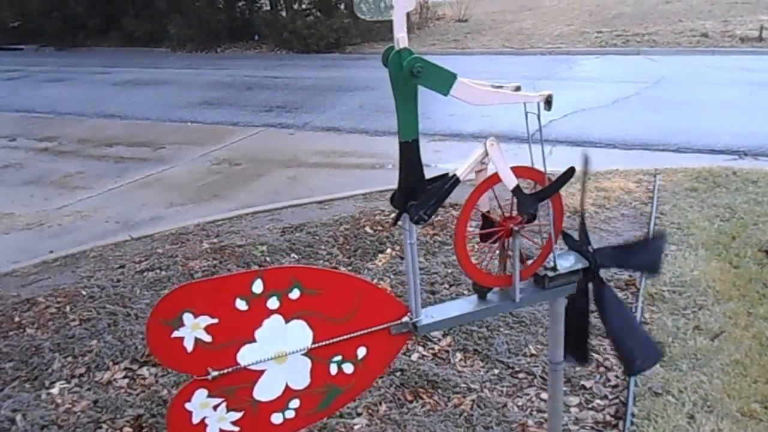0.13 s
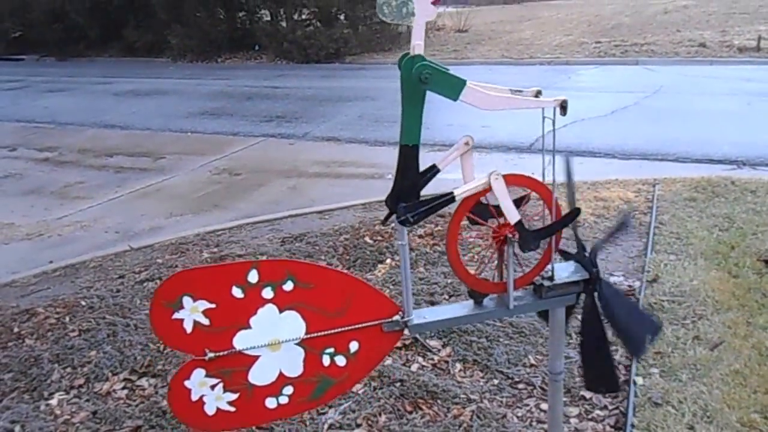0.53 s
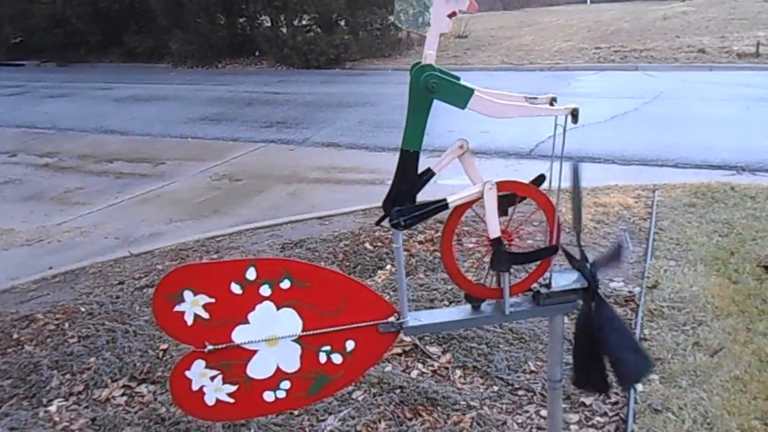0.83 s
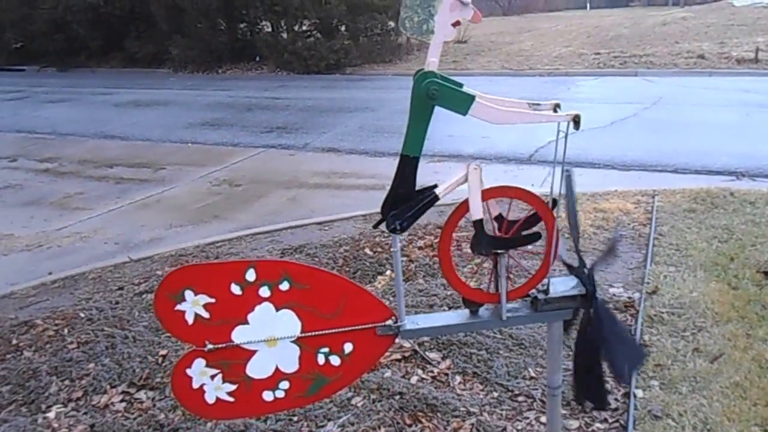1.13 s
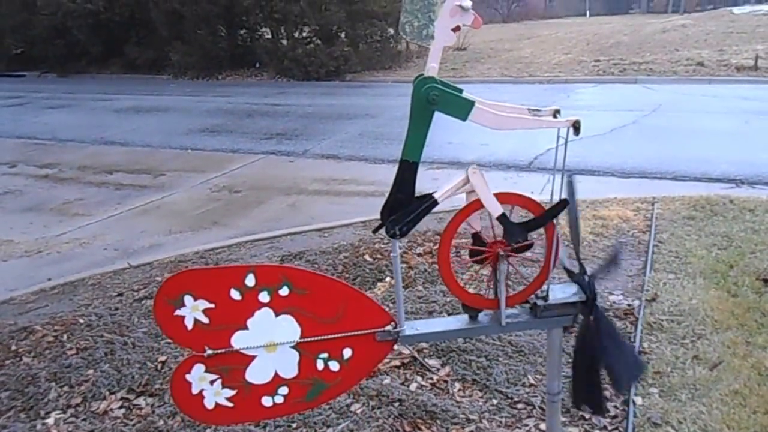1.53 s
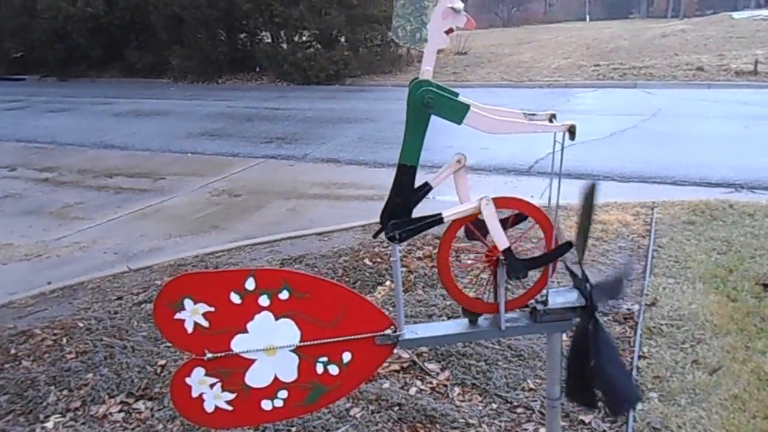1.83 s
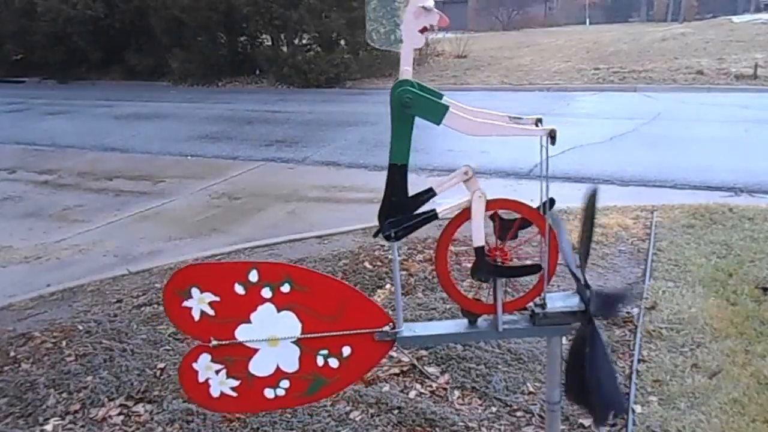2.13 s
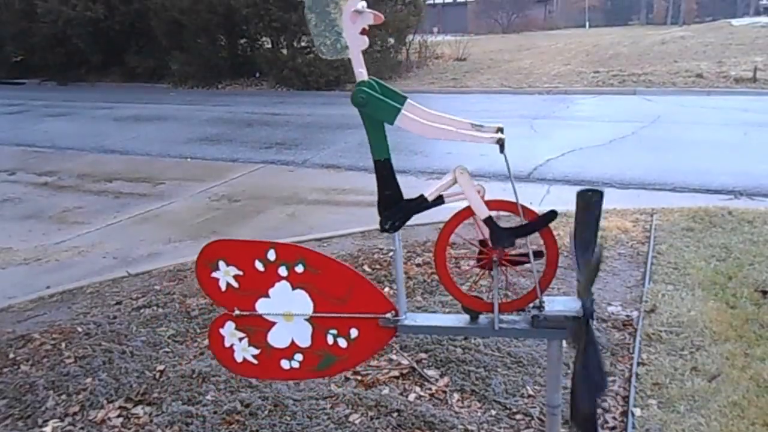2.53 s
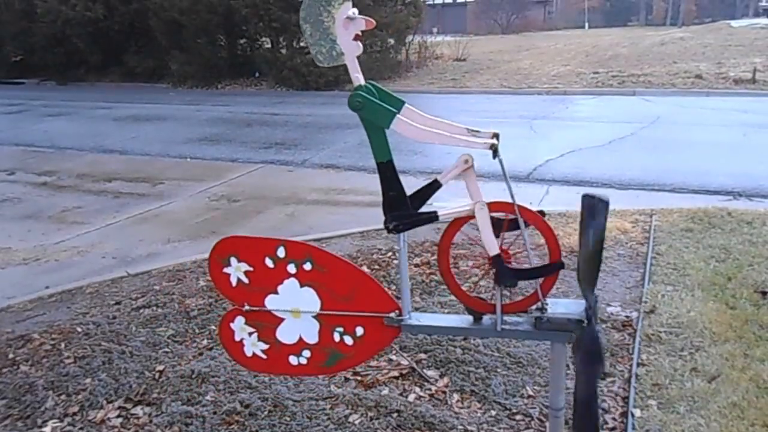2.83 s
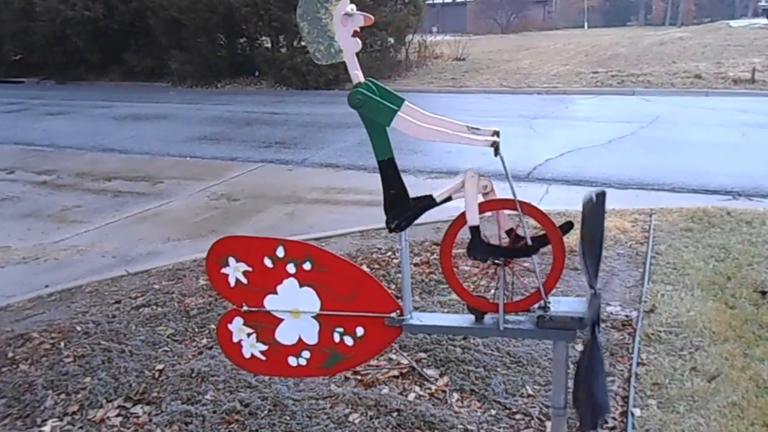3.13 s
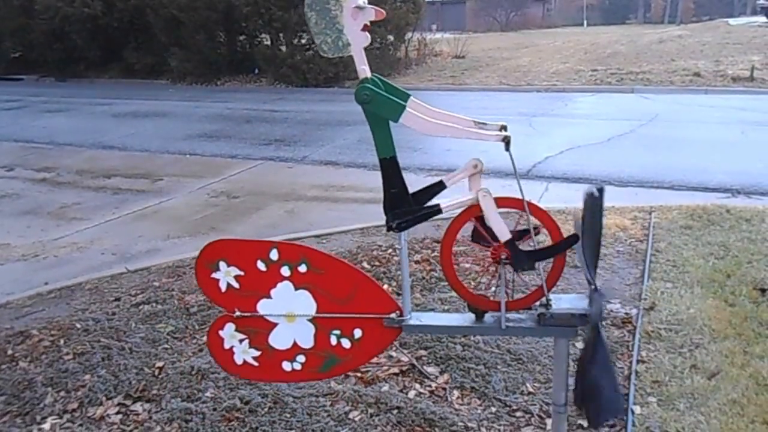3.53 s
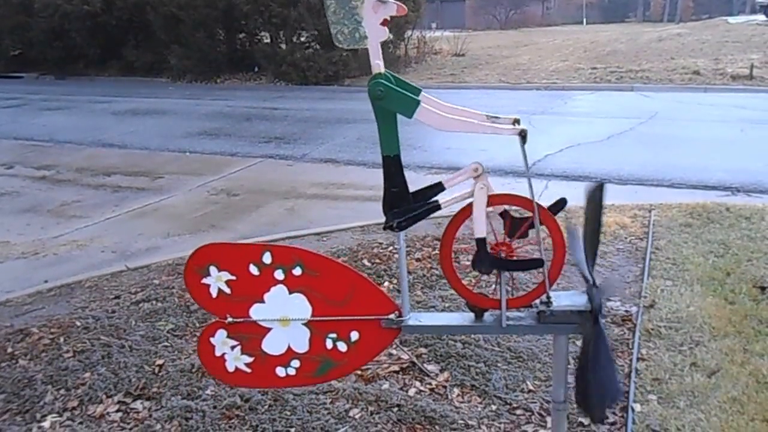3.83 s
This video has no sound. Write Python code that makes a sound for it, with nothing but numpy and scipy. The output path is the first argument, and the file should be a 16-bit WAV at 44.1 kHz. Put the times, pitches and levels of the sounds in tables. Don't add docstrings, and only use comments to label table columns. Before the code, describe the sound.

Gusty wind rumbles, thumps and flutters on a small bare camera microphone outdoors by a road, in uneven bursts over a soft distant roar, with sparse faint ticks from a spinning wind-driven lawn ornament.

```python
import sys
import numpy as np
from scipy import signal
from scipy.fft import rfft, irfft
from scipy.io import wavfile
from scipy.ndimage import uniform_filter1d

SR = 44100
rng = np.random.default_rng(int(sys.argv[2]) if len(sys.argv) > 2 else 0)


def put_to_file(sound):
    columns = np.atleast_2d(sound).T
    safe = np.clip(columns, -1, 1)
    whole_steps = np.round(safe * 32767)
    wavfile.write(sys.argv[1], SR, whole_steps.astype(np.int16))


def gain_from_decibels(decibels):
    exponent = np.asarray(decibels, float) / 20
    return 10 ** exponent


N = 176400


def evened(x):
    return x / np.sqrt(np.mean(x ** 2) + 1e-20)


def read(points, hz):
    f, value = np.transpose(points)
    return np.interp(np.log(hz + 1), np.log(f + 1), value)


def add(mix, start_s, sound):
    part = mix[max(round(start_s * SR), 0):][:len(sound)]
    part += sound[:len(part)]


def smooth(x, width, axis=-1):
    return uniform_filter1d(uniform_filter1d(x, width, axis), width, axis)


def drift(count, smooth_s):
    return evened(smooth(rng.standard_normal(count), max(int(smooth_s * SR), 2)))


def swirl(swirl_hz, length_s, sharp=0.2, thump=0.39):
    t = np.arange(int(length_s * SR)) / SR
    turn = rng.random()
    wobble = np.array([drift(8000, 0.0074), drift(8000, 0.0074)])[:, :len(t)]
    speed, size = wobble - wobble.mean(axis=1, keepdims=True)

    angle = 2 * np.pi * (turn + np.cumsum(swirl_hz * np.exp(0.18 * speed)) / SR)
    swing = np.sin(angle) + sharp * np.sin(2 * angle + 1) + sharp ** 2 * np.sin(3 * angle + 2)
    swing = evened(swing * np.exp(0.36 * size))
    slow = np.sin(2 * np.pi * (turn + 0.36 * swirl_hz * t))

    rise = 0.29
    passed = t / t[-1]
    ramp = np.minimum(passed / rise, (1 - passed) / (1 - rise)).clip(0, 1)
    return np.sin(np.pi / 2 * ramp) ** 2 * (swing + thump * slow)


def small_eddies():
    per_s, spread_db = 90, 2.5
    size = gain_from_decibels(spread_db * np.minimum(rng.exponential(1, N), 4)) * (rng.random(N) < per_s / SR)
    kind = rng.integers(0, 16, N)
    out = np.zeros(N)
    for k, swirl_hz in enumerate(np.geomspace(55, 200, num=16)):
        out += signal.oaconvolve(size * (kind == k), swirl(swirl_hz, 2.48 / swirl_hz))[:N]
    return out


def rumble():
    # time in seconds, level in dB.
    push = [(0.0, -33.5), (0.069, -13), (0.49, -21), (0.59, -30.5), (1.14, -20), (1.49, -31), (1.55, -9.5),
            (1.87, -31), (2.14, -13.5), (2.27, -30.5), (2.62, -21.5), (2.72, -29.5), (2.86, -19),
            (2.95, -26), (3.44, -15), (3.59, -24.5), (3.64, -16), (4.0, -22)]
    # frequency in Hz, density in dB per Hz.
    low_colour = [(7.1, -81), (17, 3.5), (32, 1.5), (215, -17), (318, -30), (378, -25), (462, -37.5),
                  (500, -23), (650, -37), (1100, -120)]
    hz = np.fft.rfftfreq(N, 1 / SR)
    tilt_db = read(low_colour, hz) - 30 * np.log2(np.maximum(hz / 450, 1))
    low = evened(irfft(rfft(rng.standard_normal(N)) * gain_from_decibels(tilt_db), N))
    low = low * gain_from_decibels(2.0 * drift(N, 0.042))
    s, db = np.transpose(push)
    push_db = np.interp(np.arange(N) / SR, s, db)
    return gain_from_decibels(push_db) * (gain_from_decibels(-1.5) * evened(low) + gain_from_decibels(-8.5) * evened(small_eddies()))


def roar():
    # frequency in Hz, density in dB per Hz.
    far_colour = [(88, 6), (150, -10.5), (627, -12), (1890, -16.5), (2110, -16), (2440, -22), (4860, -32.5),
                  (9490, -31), (11400, -51.5), (14800, -80), (22000, -120)]
    # frequency in Hz, width in Hz, lift in dB.
    body = [(867, 355, 5.5), (1732, 52, 8), (2098, 104, 5.5), (2226, 87, 6.5), (3074, 97, 3.5),
            (3380, 76, 3.5), (8550, 180, 4.5), (9280, 350, 4.5), (9840, 280, 9.5), (10470, 420, 10),
            (7900, 930, 1.5), (6440, 730, -3)]
    # middle in seconds, half length in seconds, frequency in Hz, width in Hz, lift in dB.
    tyres = (1.59, 0.37, 3600, 650, 5.2)
    frames, hz = N // 128 + 5, np.fft.rfftfreq(512, 1 / SR)
    real, imaginary, patches = rng.standard_normal((frames, 257, 3)).T
    patches = smooth_patches(patches)

    mid_s, half_s, tyre_hz, width_hz, tyre_db = tyres
    in_time = ((np.arange(frames) * 128 / SR - mid_s) / half_s) ** 2
    in_pitch = ((hz[:, None] - tyre_hz) / width_hz) ** 2
    lift_db = 0.69 * patches + tyre_db * np.exp(-in_time - in_pitch)
    noise = signal.istft((real + 1j * imaginary) * gain_from_decibels(lift_db), nperseg=512, noverlap=384)[1][:N]
    noise = noise * gain_from_decibels(0.02 * drift(N, 0.031))

    hz = np.fft.rfftfreq(N, 1 / SR)
    colour_db = read(far_colour, hz) - 12 * np.log2(np.maximum(200 / (hz + 1), 1))
    for body_hz, width_hz, db in body:
        colour_db += db / (1 + (2 * (hz - body_hz) / width_hz) ** 2)
    return gain_from_decibels(-30.5) * evened(irfft(rfft(noise) * gain_from_decibels(colour_db), N))


def smooth_patches(patches):
    return evened(uniform_filter1d(uniform_filter1d(patches, 6, 0), 20, 1))


def heaves():
    # start in seconds, peak in dB, swirl in Hz, length in seconds.
    slow_eddies = [(0.054, -12, 32, .06), (.26, -22, 53.7, 0.07), (.533, -20, 88, 0.015),
                   (.578, -23, 148, .02), (0.94, -17.5, 78, 0.052), (1, -17, 31.4, 0.084),
                   (1.27, -12.5, 56, 0.043), (1.536, -9, 36, 0.075), (1.66, -19, 187, 0.058),
                   (2.01, -17, 33, 0.066), (2.415, -25, 173, 0.02), (2.509, -24, 106, 0.034),
                   (2.551, -11, 39, 0.041), (2.766, -30, 101, 0.045), (2.838, -12.5, 48.5, 0.04),
                   (2.963, -20, 94, 0.034), (3.19, -20.5, 28, 0.076), (3.331, -19, 130, 0.033),
                   (3.352, -12.5, 22, 0.064), (3.39, -27, 190, 0.026), (3.481, -23.5, 157, 0.026),
                   (3.628, -12, 24, 0.09), (3.76, -33, 82, 0.021), (3.815, -18, 180, 0.023),
                   (3.87, -16, 70, 0.053), (3.953, -14.5, 56, 0.055), (1.765, -23, 62, 0.05),
                   (0.437, -18, 48, 0.042), (1.705, -21.5, 299, 0.017), (1.625, -15, 150, 0.0305),
                   (2.157, -18.5, 170, 0.026), (.21, -15, 270, 0.017), (0.25, -9, 89, 0.032),
                   (0.146, -20, 201, 0.026), (0.043, -20, 168, 0.019), (2.152, -15.5, 500, 0.01),
                   (3.455, -12.5, 160, .015), (2.9, -22, 282, .02), (0.36, -17.5, 414, .012),
                   (1.8, -31, 200, 0.032), (2.33, -24.5, 190, 0.029), (3.1, -33, 304, 0.024),
                   (.7, -28, 110, .03), (2.586, -17, 480, 0.012), (1.56, -14, 70, 0.035),
                   (2.57, -16, 90, 0.02), (3.215, -17, 60, 0.03)]
    out = np.zeros(N)
    for s, db, swirl_hz, length_s in slow_eddies:
        add(out, s - .003, gain_from_decibels(db) * swirl(swirl_hz, length_s, thump=0.18))
    return out


def buffets():
    # start in seconds, peak in dB, swirl in Hz, length in seconds.
    hard_eddies = [(0.069, -23, 225, 0.035), (0.105, -10.5, 145.7, 0.051), (0.127, -6.5, 103, 0.021),
                   (0.173, -10.5, 110, 0.039), (0.194, -15, 131, 0.053), (0.268, -13.5, 101.8, 0.053),
                   (0.356, -18.5, 208, 0.055), (0.39, -6.5, 106, 0.03), (0.457, -8.5, 165.5, 0.038),
                   (1.058, -15.5, 117, 0.029), (1.119, -14.5, 125.8, 0.032), (1.293, -5, 104.4, 0.029),
                   (1.337, -13, 99, 0.041), (1.522, -13.5, 123, 0.027), (1.554, -19, 151, 0.053),
                   (1.601, -13, 126.2, 0.0653), (1.742, -20.5, 102.7, 0.036), (2.091, -11, 182, 0.041),
                   (2.11, -6.5, 122.1, 0.053), (2.148, -19, 103.5, 0.043), (2.179, -14.5, 157, 0.0547),
                   (2.316, -24.5, 190, 0.049), (2.584, -7, 102.6, 0.031), (2.844, -14.5, 101, 0.023),
                   (2.885, -18.5, 102.4, 0.05), (3.357, -16.5, 132.7, 0.035), (3.44, -6.5, 111.3, 0.023),
                   (3.613, -10, 108, 0.021), (3.68, -7, 109.8, 0.033), (3.829, -22.5, 154.3, 0.067)]
    out = np.zeros(N)
    for s, db, swirl_hz, length_s in hard_eddies:
        add(out, s - .003, gain_from_decibels(db) * swirl(swirl_hz, length_s))
    return out


def flutters():
    # start in seconds, peak in dB, swirl in Hz, length in seconds, sharpness from 0 to 1.
    quick_eddies = [(0.075, -29, 244, 0.024, 0.4), (0.198, -17, 352, 0.018, 0.44),
                    (0.267, -17, 282, 0.019, 0.25), (0.311, -21.5, 310, 0.016, 0.1),
                    (0.344, -21, 298, 0.015, 0.6), (0.358, -14.5, 297, 0.012, 0.4),
                    (0.391, -18, 310, 0.032, 0.58), (0.428, -22, 254, 0.021, 0.3),
                    (1.356, -21, 234, 0.016, 0.25), (1.53, -33, 226, 0.011, 0.2),
                    (1.565, -25, 237, 0.027, 0.35), (1.632, -21.5, 288, 0.02, 0),
                    (1.677, -20, 283, 0.023, 0.03), (1.69, -17, 278.7, 0.03, .45),
                    (1.756, -33, 237, 0.02, 0.1), (2.098, -13.5, 252, 0.012, 0.32),
                    (2.15, -11, 387.5, 0.011, 0.7), (2.177, -23, 302, 0.026, 0.45),
                    (2.195, -17, 290, 0.016, .35), (2.326, -40, 234, 0.017, 0.1),
                    (2.414, -31, 235, 0.036, 0.2), (2.585, -12.5, 297, 0.021, 0.38),
                    (2.62, -22.5, 374, 0.0097, 0.2), (2.889, -23, 269, 0.031, 0.43),
                    (2.961, -29.5, 272.4, 0.031, 0.03), (3.187, -21, 386, 0.02, 0.24),
                    (3.329, -27, 255.5, 0.017, 0.4), (3.457, -20, 231, 0.014, 0),
                    (3.688, -20, 256, 0.015, .15), (3.817, -18, 285, 0.02, 0.08),
                    (0.101, -28, 384, 0.011, 0.2), (.183, -29, 404, .012, 0.2),
                    (0.228, -26.5, 356, 0.022, 0.24), (.372, -27, 300, 0.033, 0.5),
                    (1.057, -33, 332, 0.013, .2), (1.576, -21, 392, .014, 0.4),
                    (3.841, -22.5, 261, 0.039, 0.16), (2.721, -37.5, 386, 0.021, 0.1),
                    (3.617, -22.5, 255.5, 0.022, 0.35), (1.454, -35, 350, 0.045, 0.06)]
    out = np.zeros(N)
    for s, db, swirl_hz, length_s, sharp in quick_eddies:
        add(out, s - .004, gain_from_decibels(db) * swirl(swirl_hz, length_s, sharp, thump=1))
    return out


def ornament():
    # time in seconds, peak in dB, ring in Hz, width in Hz.
    ticks = [
        (0.083, -26, 6960, 3000),
        (0.1836, -26, 7500, 2800),
        (.8425, -26, 7050, 1500),
        (1.257, -30, 5500, 1800),
        (1.8492, -27.5, 8900, 2200),
        (2.1105, -29, 7900, 2500),
        (2.342, -35, 6000, 3000),
        (3.0139, -25, 7040, 3020),
        (3.0815, -32, 5000, 1400),
        (3.729, -28, 9900, 2500),
    ]
    # start in seconds, level in dB, top in Hz, length in seconds, bend in seconds.
    chirps = [
        (1.465, -47, 8430, .022, .009),
        (2.79, -45.5, 7900, 0.024, 0.0037),
    ]
    out = np.zeros(N)
    t = np.arange(-88, 89) / SR
    for s, db, ring_hz, width_hz in ticks:
        envelope = np.exp(-(np.pi * width_hz * t) ** 2)
        add(out, s + t[0], gain_from_decibels(db) * envelope * np.cos(2 * np.pi * ring_hz * t))
    for s, db, top_hz, length_s, bend_s in chirps:
        t = np.arange(int(length_s * SR)) / SR
        hz = top_hz - 2000 * np.exp(-t / bend_s)
        envelope = np.sin(np.pi * (t / length_s) ** .6) ** .6
        add(out, s, gain_from_decibels(db) * envelope * np.sin(2 * np.pi * np.cumsum(hz) / SR))
    return out


def snaps():
    # time in seconds, peak in dB.
    clicks = [
        (0.1308, -38),
        (0.467, -42),
        (2.136, -42),
        (2.1506, -35.5),
        (2.154, -52),
        (2.592, -41.5),
    ]
    out = np.zeros(N)
    width = np.arange(60) / SR / .00004
    for s, db in clicks:
        add(out, s, gain_from_decibels(db + 18.5) * (1 - width) * np.exp(-width))
    return out


def gain():
    # time in seconds, drop in dB, hold in seconds.
    steps = [(.131, 1, 4.7), (0.132, 6.5, 0.46), (0.464, 2, 0.092), (0.486, 1, 0.072), (1.293, 5.5, 0.21),
             (1.564, 6, 0.19), (1.61, 2, 0.17), (2.14, 5, 0.2), (2.156, 7.5, 0.17), (2.599, 5, 0.12),
             (3.338, 0, .1), (3.44, 2, 0.12), (3.687, 6.5, 0.23)]
    snap_s, recover_s = .008, 0.36
    t = np.arange(N) / SR
    drop_db = np.zeros(N)
    for s, db, hold_s in steps:
        fall = 1 - np.exp(-np.maximum(t - s, 0) / snap_s)
        drop_db += db * fall * np.exp(-np.maximum(t - s - hold_s, 0) / recover_s)
    return gain_from_decibels(-drop_db)


def scene():
    wind = rumble() + heaves() + buffets() + flutters()
    wind = 0.86 * np.tanh(wind / 0.98)
    wind = signal.sosfiltfilt(signal.butter(4, 787, fs=SR, output="sos"), wind)
    wind = signal.sosfilt(signal.butter(1, 6.0, "high", fs=SR, output="sos"), wind)
    return (wind + gain() * roar() + ornament() + snaps())[None]


def top_cut(x):
    return signal.sosfilt(signal.butter(12, 11530, fs=SR, output="sos"), x)


def record(dry):
    edge = signal.firwin(201, 11370, window=("kaiser", 8), fs=SR)
    return top_cut(signal.oaconvolve(dry, edge[None], "same"))


dry = scene()
out = record(dry)
put_to_file(out)
```